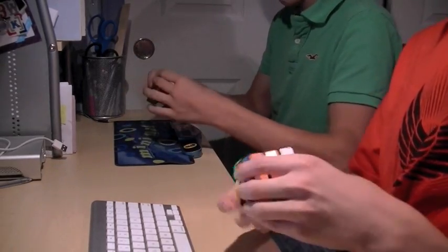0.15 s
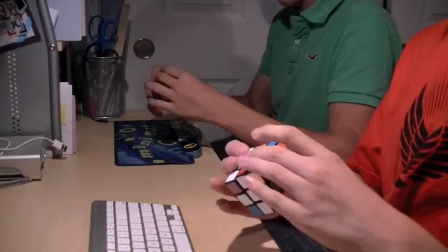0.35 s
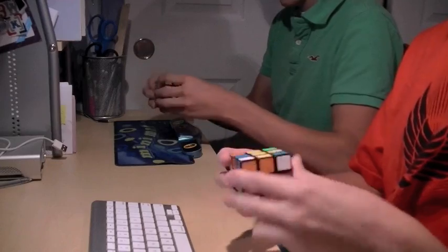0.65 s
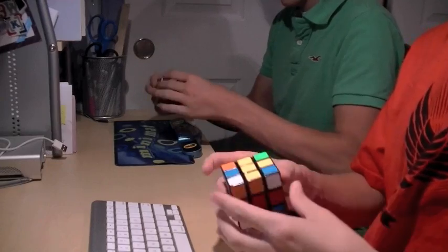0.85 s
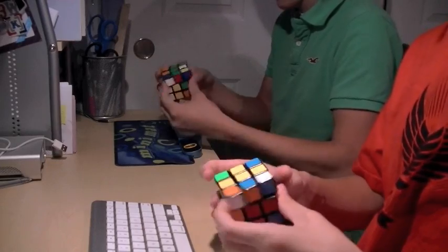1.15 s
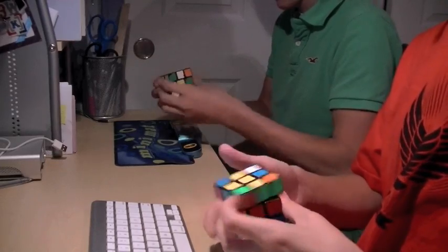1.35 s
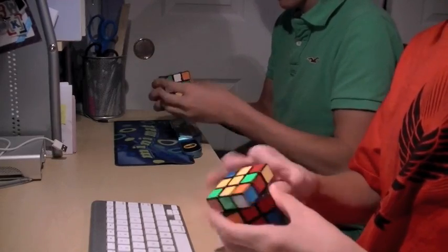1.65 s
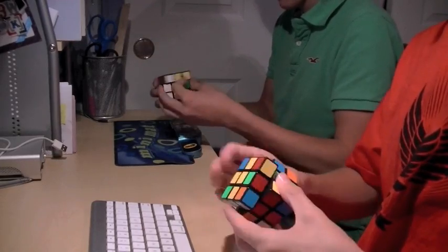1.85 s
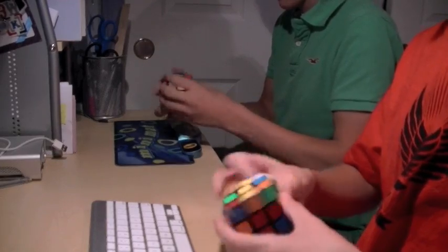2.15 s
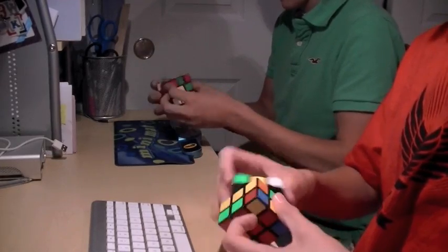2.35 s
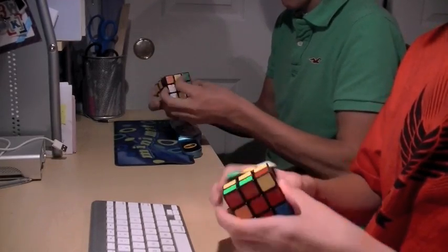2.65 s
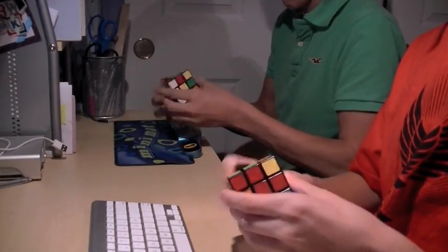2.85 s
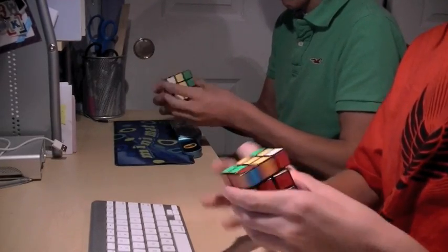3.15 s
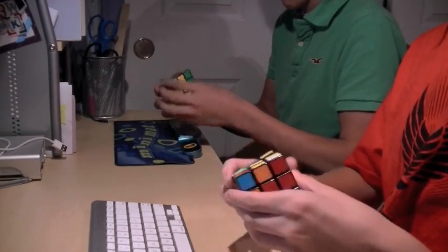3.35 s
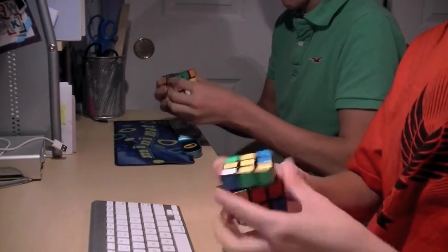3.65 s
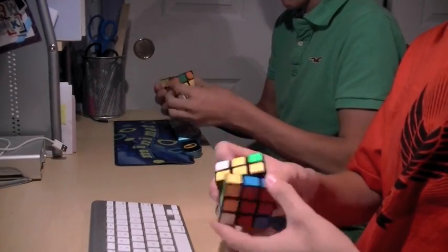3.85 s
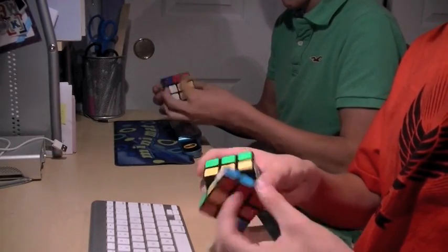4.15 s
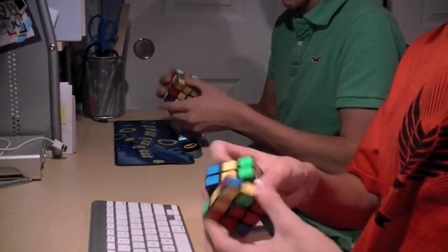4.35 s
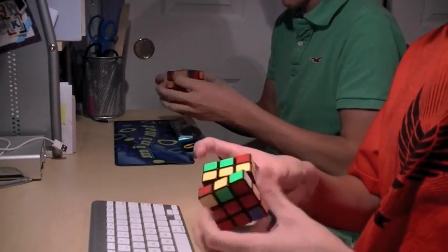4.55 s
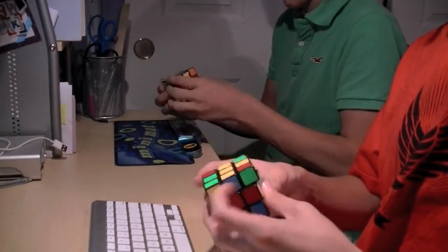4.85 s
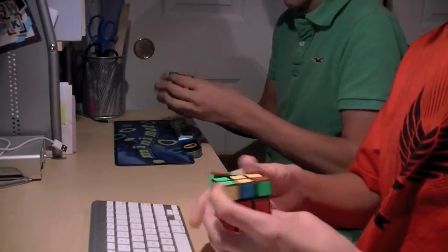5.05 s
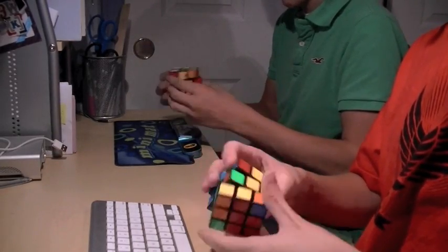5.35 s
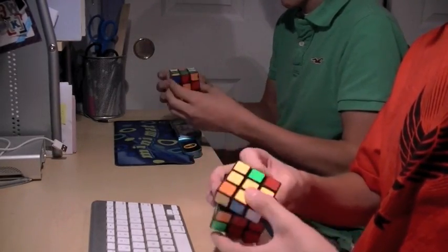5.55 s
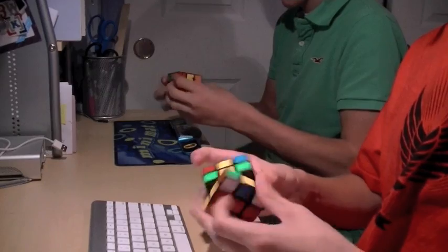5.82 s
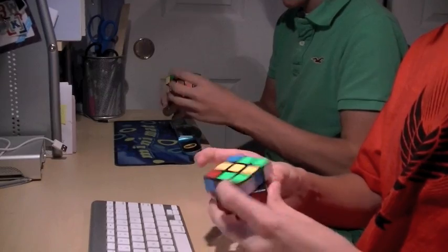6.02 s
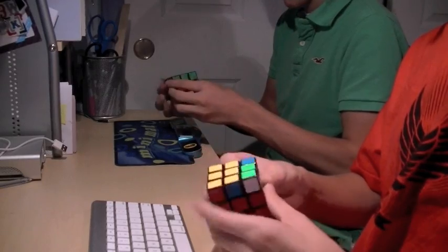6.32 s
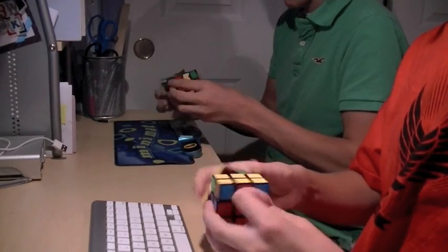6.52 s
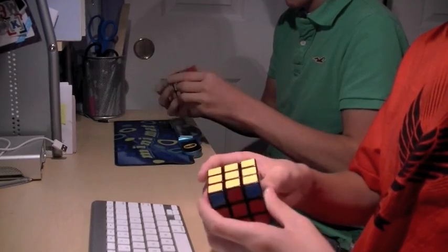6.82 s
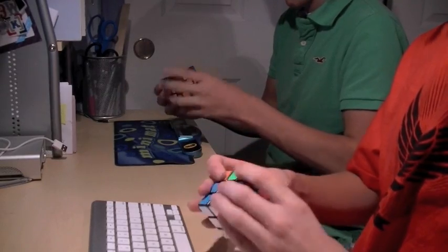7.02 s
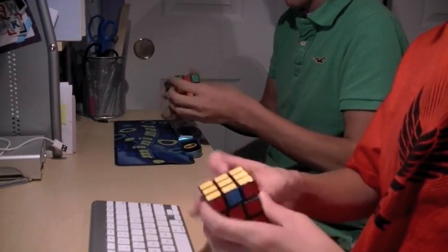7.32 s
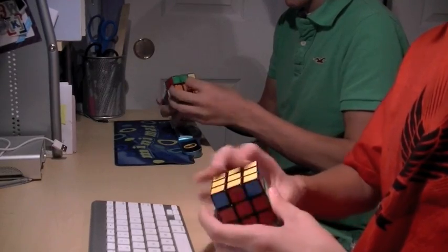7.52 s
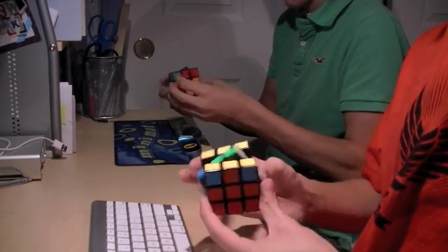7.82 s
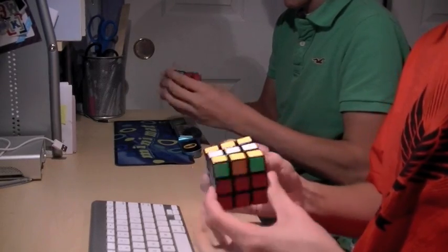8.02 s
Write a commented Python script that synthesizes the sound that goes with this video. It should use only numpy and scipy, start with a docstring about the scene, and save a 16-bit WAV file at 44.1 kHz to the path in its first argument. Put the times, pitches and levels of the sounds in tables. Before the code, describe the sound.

Close stereo sound of plastic puzzle cubes turned very fast by hand at a desk in a small room. A soft scrape opens, then a loud double clack at about 0.15 s, followed by looser single clicks and ticks until a quick pair at 0.9 s. From about 1.9 to 4.5 s the clatter is dense: bright snaps in twos and threes, hollow little knocks near 3.5 s, and brief gritty scrapes as layers slide. It thins slightly from 4.6 to 5.5 s, with light ticks, then a strong hollow-toned cluster comes at 5.7 s. More rapid bursts follow around 6.0, 6.4, 6.9 and 7.3 s, with a hard flurry at 7.8 s and sharp clacks at 8.0 s, still going at the end. Short echoes blur the gaps; very quiet air noise and a low hum with a faint wavering motor lie beneath.

```python
"""Plastic puzzle cubes, turned at speed by two people at a desk in a small room, close to a microphone pair.
Loose pieces clack home: noisy contacts ring the small pieces (snap) and the hollow cube (knock).
Turning layers scrape: a random rattle of tiny ticks, driven by the push of the fingers.
Desk and walls answer with one distinct echo and diffuse noise echoes that follow the sound's energy.
Behind it lie the sine hum of desk equipment with a small motor, and the steady filtered noise of still air."""
import sys
import numpy as np
from scipy import signal
from scipy.fft import rfft, irfft, next_fast_len
from scipy.io import wavfile
from scipy.ndimage import uniform_filter1d

SR = 44100
rng = np.random.default_rng(int(sys.argv[2]) if len(sys.argv) > 2 else 0)


def wav_out(sig):
    """Save sig, one row per channel (or a flat mono array), as 16-bit PCM at SR to the path in sys.argv[1]."""
    wavfile.write(sys.argv[1], SR, np.round(np.clip(np.atleast_2d(sig).T, -1, 1) * 32767).astype(np.int16))


N = 360633

# pieces clacking home: t/s, relative snap level/dB, hollow knock relative to snap/dB, hollow pitch in that grip f/Hz
CLACK_EVENTS = [(0.1433, -8.5, -13, 1440), (0.1494, -8, 1.5, 1640), (0.4438, -15.5, 0.5, 850),
                (0.5987, -14.5, -3.5, 764.4), (0.908, -10, -10, 865), (0.931, -10.5, -7.5, 850.4),
                (1.081, -17.5, -1, 654), (1.2541, -17.5, -19, 861), (1.287, -13.5, -13, 880),
                (1.5276, -21, 5.5, 1078), (1.5875, -23, 10, 1154), (1.6462, -11.5, 3.5, 1229),
                (1.9048, -14, -9.5, 804.5), (1.9304, -10.5, -7.5, 824), (2.0999, -14, -4, 1202),
                (2.1221, -9, -6.5, 813), (2.2498, -11.5, 1, 1072), (2.4279, -18.5, 4.5, 950),
                (2.4635, -8.5, -8, 861), (2.4837, -15.5, -10, 820), (2.6339, -11, -2.5, 825),
                (2.6633, -9.5, -12.5, 766), (2.7293, -22.5, 11.5, 1100), (2.739, -20, -3, 712.6),
                (2.7725, -18, 6.5, 1011), (2.8964, -15, -13, 950), (2.9492, -18.5, -16, 721.6),
                (3.056, -8, -5.5, 782.5), (3.083, -13, -12, 1281), (3.1914, -16.5, 5.5, 1040),
                (3.4704, -16.5, 7, 740), (3.4853, -17.5, 6.5, 625.3), (3.5069, -12, -11, 892),
                (3.6272, -15.5, -15.0, 1349), (3.7575, -10.5, -7, 996), (3.9548, -10, -9, 791),
                (3.9617, -9.5, -9, 780), (3.9796, -13.5, -16, 910), (4.172, -19.5, 4.5, 691.7),
                (4.221, -9.5, -10.5, 800), (4.2257, -11.5, -5, 820), (4.2492, -11, -7.5, 878),
                (4.286, -13, -4, 717), (4.3979, -14.5, -5, 848), (4.4085, -9.5, -3, 861),
                (4.5365, -12.5, 1, 713.7), (4.9788, -12, 1.5, 722), (5.0962, -22.5, 5.5, 700),
                (5.1685, -16.5, 5.5, 950), (5.5862, -20, 0, 905.4), (5.7066, -7.5, -3, 1019),
                (5.731, -9, 3.5, 940), (5.756, -12, 0, 960), (5.7896, -16, 3.5, 763),
                (5.913, -11.5, 0, 690), (5.9489, -18.5, -1, 860), (5.9691, -10, -4.5, 854),
                (5.999, -10, -3, 1189), (6.1108, -17.5, -11, 841), (6.1514, -11.5, -7, 1099),
                (6.1813, -12, -7, 760.6), (6.3868, -18.5, 10.5, 707.2), (6.434, -8.5, -9, 871),
                (6.5276, -12, -9, 880.5), (6.5613, -17, 4, 1012), (6.893, -8, -7, 894),
                (6.915, -10.5, -7, 899), (6.9483, -9.5, -7, 1019), (6.9814, -15, -11, 830),
                (7.2553, -8.5, -9, 920), (7.2874, -12, -2, 1067), (7.4558, -13.5, -1.5, 1003),
                (7.4817, -9, -3.5, 880), (7.5185, -15.5, -7, 1207), (7.7668, -9.5, -3, 859),
                (7.7776, -7, -0.5, 914), (7.7998, -9.5, -28, 870), (7.8128, -12, -28, 1085),
                (7.889, -9.5, -7, 846), (7.999, -7.5, -7.5, 1090), (8.0056, -14, -1, 1101)]
# loose pieces ticking between the clacks: t/s, relative snap level/dB
TICK_EVENTS = [(0.0014, -17.5), (0.2526, -19.5), (0.4083, -24), (0.543, -30), (0.581, -23.5), (0.619, -21),
               (0.743, -30), (0.7506, -23), (0.865, -22.5), (0.988, -33), (1.029, -23), (1.068, -28),
               (1.165, -21.5), (1.262, -18), (1.34, -29), (1.407, -23.0), (1.431, -33), (1.4412, -26.5),
               (1.5643, -21.5), (1.736, -29.5), (1.854, -29), (2.025, -22), (2.3442, -17), (2.407, -23),
               (2.445, -25), (3.032, -20.5), (3.17, -23.5), (3.3844, -20), (3.423, -26), (3.579, -20),
               (3.7289, -24.5), (3.777, -20), (3.9139, -20.0), (4.0394, -20.5), (4.069, -21.5),
               (4.3491, -17.5), (4.458, -21), (4.507, -17.5), (4.719, -24), (4.834, -21), (4.9308, -24),
               (5.076, -22), (5.191, -18.5), (5.226, -35), (5.267, -33), (5.36, -28), (5.386, -24),
               (5.401, -34), (5.469, -22), (5.528, -22.5), (5.6656, -27.5), (5.69, -23), (5.818, -22.5),
               (5.885, -20.5), (6.269, -26), (6.352, -19.5), (6.459, -18.5), (6.583, -21), (6.6083, -29),
               (6.6313, -21), (6.756, -32), (6.8655, -21.5), (7.1824, -28), (7.245, -20.5), (7.4112, -25.5),
               (7.602, -21.5), (7.6892, -19), (7.8312, -19.5), (7.932, -18), (8.101, -24.5),
               (8.1663, -20.5)]
TICK_KNOCK_DB, TICK_HOLLOW_HZ = -1, 950  # their knock relative to the snap, and its median pitch
# hard plastic contact, spectrum: f/Hz, relative level/dB
PLASTIC_COLOUR = [(70, -62), (600, -57), (1450, 1), (4700, 0), (7000, -1), (9000, -4), (11000, -13),
                  (13000, -16), (15500, -45)]
# modes of the small pieces before detuning: f/Hz
PIECE_MODES = [2715, 3330, 3720, 4370, 4730, 5790, 6660]
RING_DB, RING_SPREAD_DB, RING_WIDTH_HZ = -6, 6, 220
DETUNE = .04  # spread of the piece modes, as log frequency
FREE_HZ, FREE_RANGE = 865, 0.056  # hollow pitch in a loose grip, and its log range before the hands damp it
FREE_WIDTH_HZ, GRIPPED_WIDTH_HZ = 250, 1000  # width of the hollow resonance, ringing freely and gripped
# turns of a layer: start t/s, length/s, finger push as relative scrape level/dB
LAYER_TURNS = [(0.0, 0.017, -31.5), (0.135, 0.012, -25), (0.226, 0.058, -40.5), (0.372, 0.12, -43),
               (0.578, 0.24, -51.5), (0.898, 0.015, -24.5), (1.06, 0.025, -34), (1.252, 0.047, -35),
               (1.423, 0.057, -35.5), (1.66, 0.014, -23.5), (1.9, 0.15, -37), (2.069, 0.031, -36.5),
               (2.181, 0.098, -34.5), (2.345, 0.145, -38.5), (2.612, 0.046, -38), (2.722, 0.031, -30),
               (2.869, 0.1, -39), (2.995, 0.23, -38.5), (3.335, 0.12, -40), (3.47, 0.045, -24.5),
               (3.555, 0.063, -36), (3.739, 0.06, -29.5), (3.929, 0.14, -37), (4.119, 0.072, -35),
               (4.388, 0.18, -34.5), (4.816, 0.0556, -31.5), (4.971, 0.021, -27.5), (5.06, 0.23, -40.5),
               (5.39, 0.125, -41.5), (5.572, 0.044, -29), (5.689, 0.049, -28.5), (6.093, 0.087, -33),
               (6.306, 0.093, -34.5), (6.488, 0.16, -34), (6.775, 0.08, -51), (6.851, 0.14, -38.5),
               (7.452, 0.035, -29.5), (7.767, 0.19, -34.5), (7.983, 0.019, -24.5)]
START_S, STOP_S = 0.0057, 0.0051  # time constants with which a slide starts and stops
SLAP_S, SLAP_DB = .0078, -13.5  # delay and level of the first echo
# desk and room resonances that the knocks excite: f/Hz, width/Hz, relative level/dB
BODY_MODES = [(386.5, 27, -1.5), (467, 20, -2), (575, 27.1, 7), (691, 58, 5), (765, 49, 2.5), (877, 34, 2),
              (974, 31, 1), (1169, 136, 3.5)]
# side channel of the microphone pair, gain: f/Hz, level/dB
SIDE_GAIN = [(200, -18), (800, -16), (1400, -23), (2700, -20.5), (4800, -15), (6400, -13.5), (8500, -2.5),
             (11000, -7), (14000, -7.5)]
# swell of the hum's octave, relative to its set level: t/s, level/dB
OCTAVE_SWELL = [(0, -1.5), (5.2, 2), (8.2, -1)]
# small motor running down: t/s, f/Hz, relative level/dB
MOTOR_COURSE = [(1.35, 143.7, -93), (1.5, 142.4, -69), (2.75, 136.1, -62), (4.6, 138, -65.5),
                (5.4, 131.4, -72), (8.2, 133.4, -79)]
# still air of the room, spectrum: f/Hz, relative level/dB
AIR_COLOUR = [(20, -11), (60, 2), (180, 7.5), (600, 6.5), (2000, 1), (12000, -36)]
TOP_HZ = 16000  # upper limit of the sound's spectrum


def clacks(graze_s, graze_db, snap_t60, knock_t60, chatter_db, snap_db, knock_db, crack_db, thud_db,
           hard_tilt_db, hard_stretch, rebound_db, size=2048):
    """A graze, a spiky chatter and a rebound per clack: bright snaps and hollow knocks, each as mid and side."""
    ticks = [(s, db, TICK_KNOCK_DB, TICK_HOLLOW_HZ * np.exp(0.26 * rng.standard_normal()))
             for s, db in TICK_EVENTS]
    s, level, hollow_db, hollow_hz = np.vstack([CLACK_EVENTS, ticks]).T
    count = len(s)
    lead = SR // 100  # samples of grazing before the seat
    t = (np.arange(size) - lead) / SR
    draw = rng.standard_normal((count, 4, size))
    spikiness = unit(uniform_filter1d(draw[:, 2:3], size=12))
    chatter = draw[:, :2] * amp(chatter_db * spikiness)
    # the piece grazes its neighbours just before it seats
    graze = amp(graze_db) * np.exp(-np.abs(t) / graze_s)

    def blow(t60, lead_in):
        """Chatter that enters with the lead-in and dies away after the seat."""
        return chatter * np.where(t < 0, lead_in, amp(-60 * np.abs(t) / t60))

    # the moment of seating is one sharp impulse, in mid only
    seat = np.outer([1, 0], t == 0)
    play = draw[:, 3, :1, None]
    rebound_s = 0.0011 * np.exp(play / 2)
    # hard contacts are brighter than soft ones and chatter for longer
    hardness = np.tanh((level - level.mean()) / level.std())[:, None, None]
    tilt = hard_tilt_db * hardness

    def snap_colour(hz):
        """Plastic and ringing pieces, with the rebound and a treble tilt that follows hardness."""
        rebound = 1 + amp(rebound_db) * np.exp(-2j * np.pi * hz * rebound_s)
        treble = amp(tilt * hz ** 2 / (hz ** 2 + 2600 ** 2))
        return plastic(hz) * pieces(hz, count) * rebound * treble

    snap_blow = blow(snap_t60 * hard_stretch ** hardness, graze)
    snap = filtered(snap_blow + amp(crack_db) * seat, snap_colour)
    # a grip that pulls the hollow off its free pitch also damps it
    pitch = hollow_hz[:, None, None]
    freedom = np.exp(-(np.log(pitch / FREE_HZ) / FREE_RANGE) ** 2)
    width = GRIPPED_WIDTH_HZ + freedom * (FREE_WIDTH_HZ - GRIPPED_WIDTH_HZ)
    knock_blow = blow(knock_t60, 0) + amp(thud_db) * seat
    knock = filtered(knock_blow, lambda hz: cavity(hz, pitch, width))
    snap = amp(snap_db) * unit(snap)
    knock = amp(knock_db + hollow_db)[:, None, None] * unit(knock)
    # levels count as rms over one millisecond
    hits = np.stack([snap, knock], axis=1) * np.sqrt(SR / 1000 / size)
    return placed(s * SR - lead, amp(level)[:, None, None, None] * hits)


def plastic(hz):
    """Causal (minimum-phase) colour of a hard contact, of power gain 1."""
    cepstrum = irfft(np.log(amp(along(PLASTIC_COLOUR, hz))))
    # folding the cepstrum onto positive times makes the response causal
    fold = 1 + np.sign(len(cepstrum) / 2 - np.arange(len(cepstrum)))
    return unit(np.exp(rfft(cepstrum * fold)))


def pieces(hz, count):
    """Ring of the small pieces: each of count contacts favours other modes, a little off pitch."""
    strength, detune = rng.standard_normal((2, len(PIECE_MODES), count, 1, 1))
    ring = 0
    for centre, a, d in zip(PIECE_MODES, strength, detune):
        gain = amp(RING_DB + RING_SPREAD_DB * np.minimum(a, 2))
        ring = ring + gain * mode(hz, centre * np.exp(DETUNE * d), RING_WIDTH_HZ)
    return 1 + ring


def cavity(hz, centre_hz, width_hz, edge=0.66):
    """Resonance of the hollow cube, damped by the hands; so small a thing radiates little below it."""
    edge_hz = edge * centre_hz
    return unit(mode(hz, centre_hz, width_hz) ** 2 * mode(hz, edge_hz, edge_hz) * 1j * hz)


def mode(hz, centre_hz, width_hz):
    """One damped resonance, of gain 1 at its centre."""
    return 1j * hz * width_hz / (centre_hz ** 2 - hz * hz + 1j * hz * width_hz)


def scrape(rate, spread_db, tick_t60, scrape_db, hollow_db, size=256):
    """Sliding layers catch on each other's edges: tiny separate ticks, each with its own ring and hollow."""
    force = push()
    starts = np.flatnonzero((rng.random(N) < rate / SR) & (force > 0))  # rate in ticks per second
    count = len(starts)
    weight, grip = np.clip(rng.standard_normal((2, count, 1, 1)), -2, 2)
    decay_db = -60 * np.arange(size) / SR / tick_t60
    ticks = rng.standard_normal((count, 2, size)) * amp(spread_db * weight + decay_db)
    bright = filtered(ticks, lambda hz: unit(plastic(hz) * pieces(hz, count)))
    centre_hz = 760 * np.exp(0.17 * grip)
    hollow = filtered(ticks, lambda hz: cavity(hz, centre_hz, width_hz=600, edge=0.46))
    rattle = placed(starts, np.stack([bright, hollow], axis=1))
    # the push of the fingers sets the energy, the ticks only share it out
    power = np.abs(uniform_filter1d(rattle[:, :1] ** 2, size=1000)) + 1e-6
    return amp([scrape_db, hollow_db])[:, None, None] * force * rattle / np.sqrt(power)


def push():
    """Gain of the sliding: each turn takes hold, keeps its push and stops short as the layer seats."""
    t = np.arange(N) / SR
    power = np.zeros(N)
    for start, length, db in LAYER_TURNS:
        end = start + length + 10 * STOP_S
        near = slice(round(max(start, 0) * SR), round(end * SR))
        age = np.abs(t[near] - start)
        onset = 1 - np.exp(-age / START_S)
        stop = np.exp(-np.maximum(age - length, 0) / STOP_S)
        power[near] += (amp(db) * onset * stop) ** 2
    return np.sqrt(power)


def slap(x):
    """A distinct early echo off a hard surface nearby."""
    return filtered(x, lambda hz: amp(SLAP_DB) * np.exp(-2j * np.pi * hz * SLAP_S))


def room(x, colour, splits_hz, wet_db, t60, desk_db, desk_t60=0.082):
    """Diffuse echoes, mid and side: each band's energy returns quickly off the desk, slowly off the walls."""
    t = np.arange(SR // 2) / SR
    walls = amp(wet_db) * unit(amp(-60 * t / t60) * np.clip(t / 0.0016, 0, 1))
    desk = amp(desk_db) * unit(amp(-60 * t / desk_t60) * (t > .002))
    m = 2 * next_fast_len((N + len(t)) // 2 + 1, real=True)
    answer = rfft((walls ** 2 + desk ** 2) / len(t), m)
    hz = np.fft.rfftfreq(m, 1 / SR)
    source, tint, out = rfft(x, m), colour(hz), 0
    for band in bands(hz, splits_hz):
        power = irfft(source * band) ** 2
        energy = np.abs(irfft(rfft(power) * answer))
        # fresh noise carries the echoed energy
        noise = rng.standard_normal((2, m)) * np.sqrt(energy)
        out = out + rfft(noise) * unit(tint * band)
    return irfft(out)[:, :N]


def body(hz):
    """Resonances of desk and room in the range of the knocks, of power gain 1."""
    modes = sum(amp(db) * mode(hz, centre, width) for centre, width, db in BODY_MODES)
    band = signal.butter(2, [300, 1700], "bandpass", fs=SR)
    return unit(modes * signal.freqz(*band, worN=hz, fs=SR)[1])


def bands(hz, splits_hz):
    """Gains of neighbouring bands whose powers add up to 1."""
    below = [1 / (1 + (hz / split) ** 16) for split in splits_hz]
    return np.sqrt(np.abs(np.diff(below, axis=0, prepend=0, append=1)))


def hum(mains_db, buzz_db, motor_db):
    """Mains hum and its slowly swelling octave, beating against the small motor: all sines."""
    mains = 2 * np.pi * 60 * np.arange(N) / SR  # phase at 60 Hz
    pitch, level = curves(MOTOR_COURSE)
    swell, = curves(OCTAVE_SWELL)
    fundamental = amp(mains_db) * np.sin(mains)
    octave = amp(buzz_db + swell) * np.sin(2 * mains)
    motor = amp(level + motor_db) * np.sin(2 * np.pi * np.cumsum(pitch) / SR)
    return np.sqrt(2) * (fundamental + octave + motor)


def air(air_db, side_db):
    """Soft steady room noise, shaped by frequency; mid and side."""
    noise = unit(filtered(rng.standard_normal((2, N)), lambda hz: amp(along(AIR_COLOUR, hz))))
    return noise * amp([[air_db], [air_db + side_db]])


def amp(db):
    """Decibels to gain."""
    return 10 ** (np.asarray(db) / 20)


def unit(x):
    """Rms 1 along the last axis."""
    return x / np.sqrt(np.mean(np.abs(x) ** 2, axis=-1, keepdims=True) + 1e-20)


def along(points, hz):
    """(f/Hz, value) points read on a log frequency axis."""
    f, v = np.transpose(points)
    return np.interp(np.log(hz + 1), np.log(f), v)


def curves(rows):
    """One value per sample for each column after the time."""
    s, *cols = np.transpose(rows)
    return [np.interp(np.arange(N) / SR, s, c) for c in cols]


def filtered(x, response):
    """x passed through a complex response of frequency."""
    n = x.shape[-1]
    m = 2 * next_fast_len(n * 2 // 3)  # padded, so that tails have room
    return irfft(rfft(x, m) * response(np.fft.rfftfreq(m, 1 / SR)), m)[..., :n]


def placed(starts, sounds):
    """Short sounds laid on the time line, each at its starting sample."""
    size = sounds.shape[-1]
    out = np.zeros(sounds.shape[1:-1] + (N + 2 * size,))
    for start, sound in zip(starts, sounds):
        out[..., round(start) + size:][..., :size] += sound
    return out[..., size:size + N]


def scene():
    """The cubes in front of a close microphone pair, whose channels differ mostly in the treble."""
    hits = clacks(graze_s=0.01, graze_db=-19.5, snap_t60=0.014, knock_t60=0.012, chatter_db=4.0,
                  snap_db=0.17, knock_db=-5.5, crack_db=5.5, thud_db=12.0,
                  hard_tilt_db=12.5, hard_stretch=1.53, rebound_db=-6.5)
    slides = scrape(rate=650, spread_db=11.5, tick_t60=0.012, scrape_db=-0.06, hollow_db=-6.5)
    bright, hollow = hits + slides

    def dulled(hz):
        """The walls soak up the highest treble."""
        return plastic(hz) / np.sqrt(1 + (hz / 11000) ** 4)

    bright_room = room(bright[0], dulled, splits_hz=[2200, 3900, 6500], wet_db=-4.5, t60=0.33, desk_db=-8.0)
    bright = bright + slap(bright) + bright_room
    hollow_room = room(hollow[0], body, splits_hz=[540, 790, 1000], wet_db=-4.5, t60=0.39, desk_db=-4.0)
    hollow = hollow + amp(-20.5) * filtered(hollow, body) + hollow_room
    mid, side = bright + hollow
    side = filtered(side, lambda hz: amp(along(SIDE_GAIN, hz)))
    mid, side = np.array([mid, side]) + air(air_db=-57.5, side_db=2.0)
    drone = hum(mains_db=-81.5, buzz_db=-60, motor_db=4.0)
    # the hum is in phase in both channels, slightly louder in the second
    return np.array([mid + side, mid - side]) + drone * amp([[-.7], [.7]])


def record(dry):
    """The camera rounds off the highest peaks; nothing sounds above TOP_HZ."""
    rounded = dry / (1 + (dry / .8) ** 4) ** (1 / 4)
    return filtered(rounded, lambda hz: hz < TOP_HZ)


dry = scene()
out = record(dry)
wav_out(out)
```